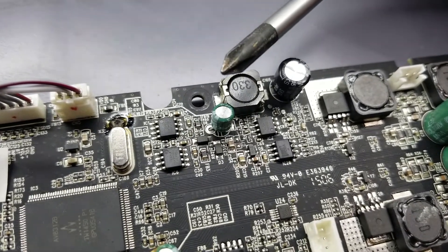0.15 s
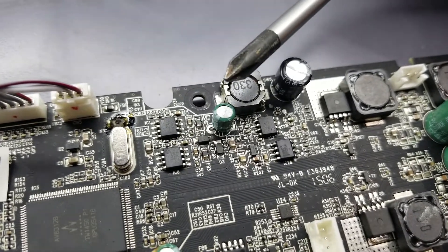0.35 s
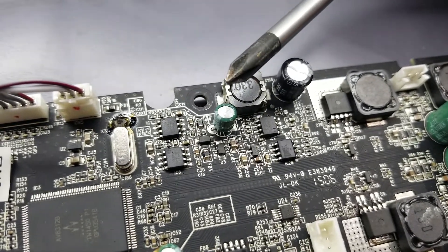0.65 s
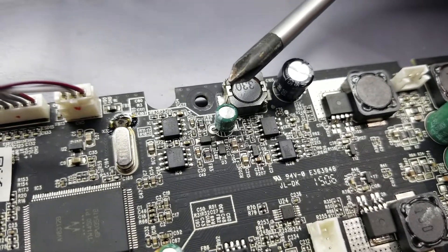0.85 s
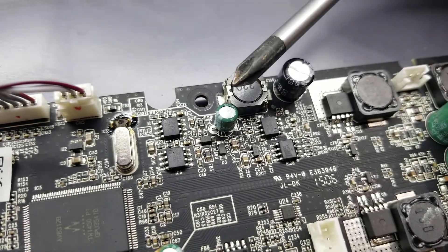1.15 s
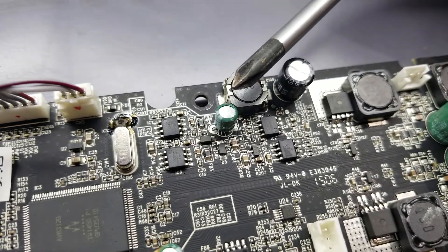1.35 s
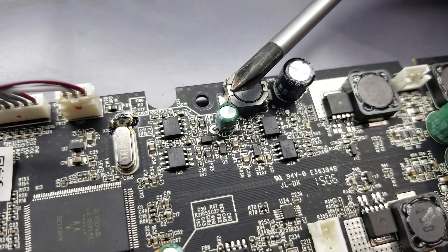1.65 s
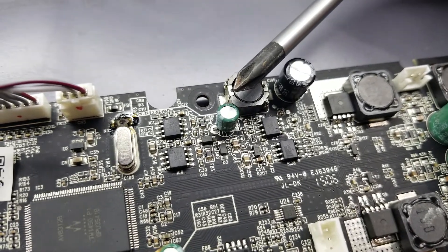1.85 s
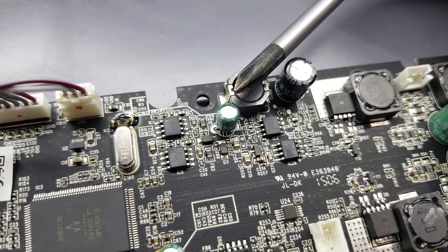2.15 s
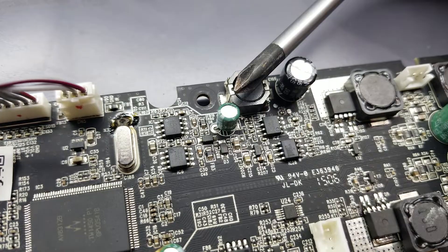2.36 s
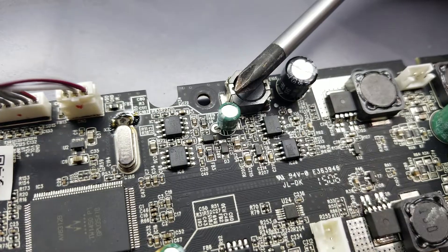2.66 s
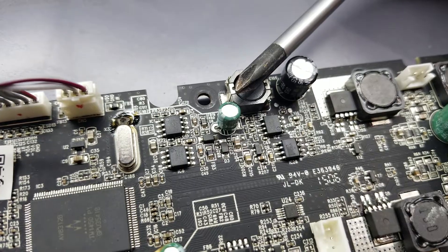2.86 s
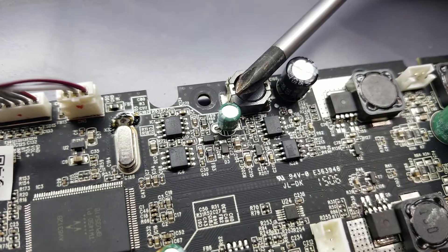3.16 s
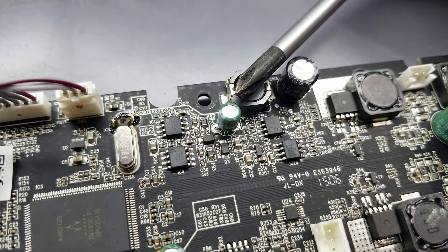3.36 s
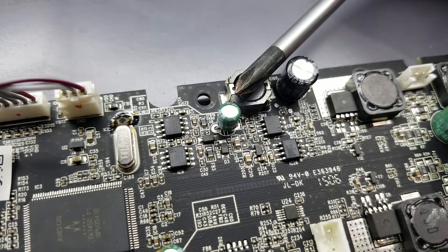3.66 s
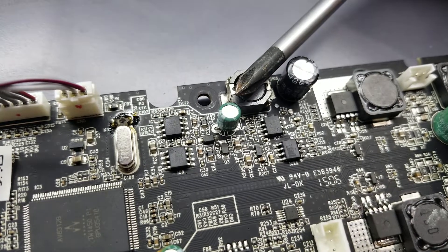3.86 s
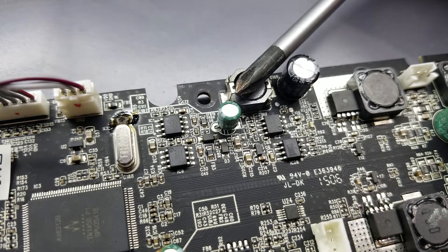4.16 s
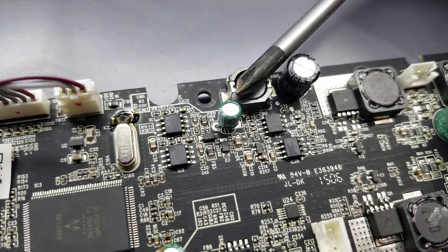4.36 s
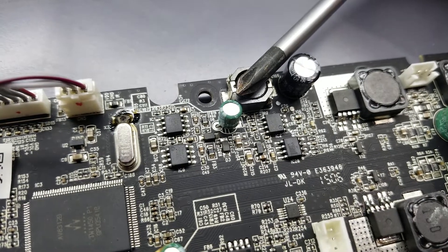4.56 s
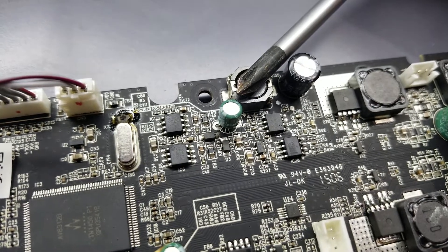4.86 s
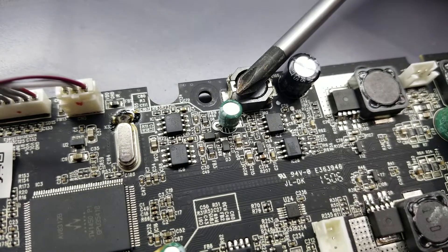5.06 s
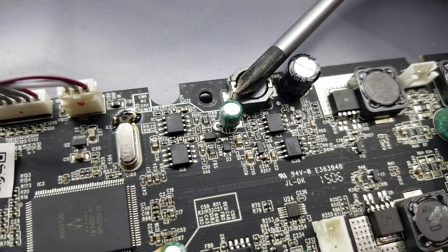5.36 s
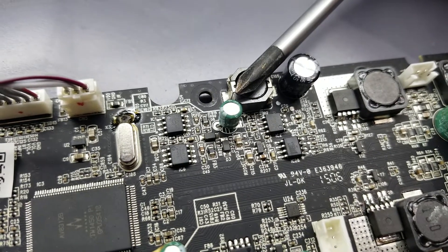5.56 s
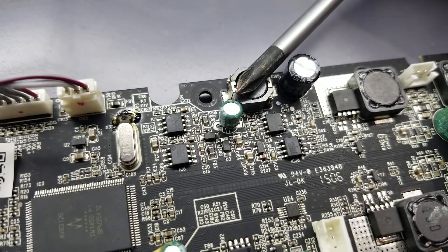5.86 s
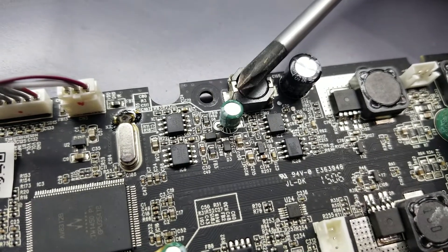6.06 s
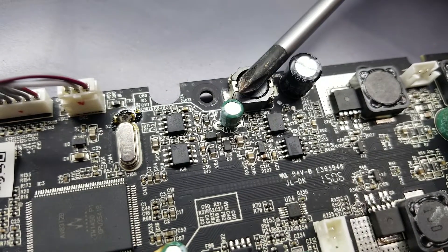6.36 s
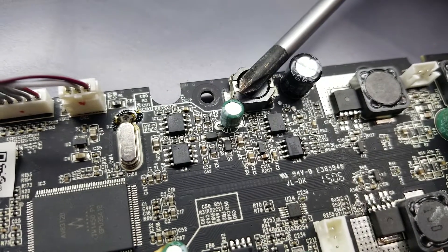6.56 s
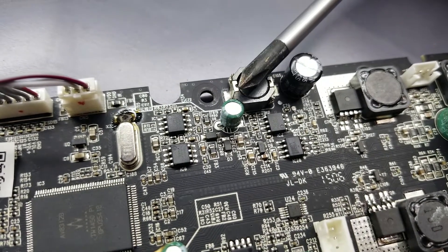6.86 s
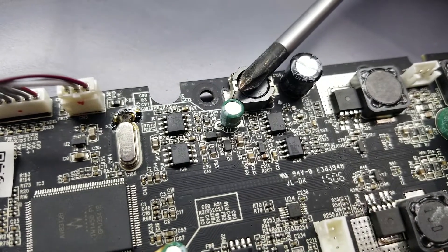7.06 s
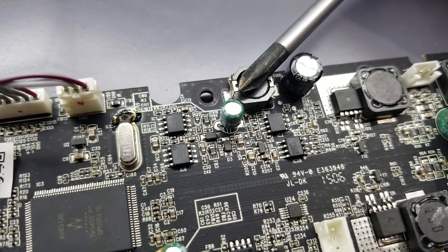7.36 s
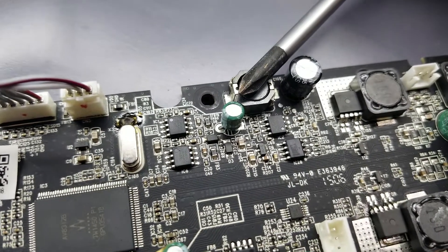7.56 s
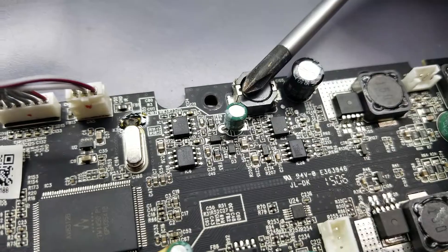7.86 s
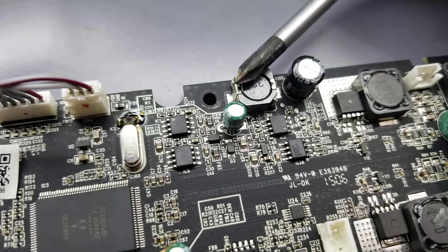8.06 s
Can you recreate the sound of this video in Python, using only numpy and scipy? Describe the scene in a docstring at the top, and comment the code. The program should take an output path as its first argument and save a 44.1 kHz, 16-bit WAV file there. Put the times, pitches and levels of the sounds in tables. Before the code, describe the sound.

Close stereo pickup in a small quiet room. A circuit-board coil whines very high and thin, sagging slightly as a steel screwdriver tip approaches. A crisp click with a soft low knock lands midway; the whine drops and grows much louder. The tip lifts and clicks back twice, the pitch jumping up and falling again, then slides off with tiny scrapes and ticks. A faint low electrical and fan hum continues beneath.

```python
"""Coil whine touched by a steel tip

A coil on a circuit board whines near the top of hearing. A steel screwdriver tip nears it, snaps onto it,
lifts off twice and scrapes away: steel on the core lowers the pitch and the shaft radiates the tone louder.
Strikes and scrapes drive decaying board, coil and shaft modes; knocks are low decaying sines.
Two close ports also receive mains and fan sines, a small room's echo and tail, and coloured noise."""
import sys
import numpy as np
from scipy import signal
from scipy.fft import rfft, irfft
from scipy.io import wavfile

SR = 44100
rng = np.random.default_rng(int(sys.argv[2]) if len(sys.argv) > 2 else 0)


def master(y):
    """Save y as 16-bit WAV."""
    cut = np.clip(np.atleast_2d(y).T, -1, 1)
    pcm = np.round(cut * 32767)  # scale
    wavfile.write(sys.argv[1], SR, pcm.astype(np.int16))


N = 361619
T = np.arange(N) / SR  # time in seconds

# Random wobble of the tone. Each row: cutoff rate in Hz, pitch spread in Hz, level spread in dB.
WOBBLE = [(10, 2.2, .35), (45, 2.4, .5), (300, 5, .16)]
# Pitch while the tip first nears the coil. Each row: time in seconds, pitch in Hz.
APPROACH_PITCH = [(0, 13736), (1.097, 13743), (1.95, 13733), (2.35, 13723), (2.897, 13711), (3.277, 13670),
                  (3.65, 13657), (3.834, 13626), (4.074, 13564), (4.22, 13554), (4.265, 13507),
                  (4.31, 13512), (4.355, 13455), (4.405, 13466), (4.465, 13346), (4.5, 13344)]
# Hops of the tip off the coil. Each row: lift, turn back and landing in seconds, top pitch in Hz,
# pitch just before landing in Hz.
HOPS = [(6.068, 6.215, 6.346, 13690, 13385), (6.763, 6.83, 7.072, 13660, 13215)]
FIRST_TOUCH_S = 4.522  # contact is complete
HOP_RISE_S, HOP_FALL_POWER = 0.014, 2.06
LAND_S, LIFT_S = 0.0094, 0.008  # time for contact to close and to open
# The shaft just above the coil shades the left port and reflects to the right.
# The pair: left change in dB, right change in dB, both at full hop height.
HOP_SHADE_DB = [-3, 5]
# Radiation of the untouched coil to the ports at each pitch. Each row: pitch in Hz, left level in dB,
# right level in dB, phase by which left leads in turns.
BARE_COIL = [(13280, -37, -42, -1.12), (13350, -38, -45, -1.12), (13430, -39.5, -48, -1.07),
             (13500, -40.3, -56, -1.15), (13570, -40.8, -54, -1.22), (13597, -46, -52.5, -1.12),
             (13630, -41.5, -57, -.92), (13670, -40.3, -59, -.97), (13722, -36, -70, -.45),
             (13746, -39, -64, -.35)]
# Radiation with the tip seated. Each row: pitch in Hz, left minus right in dB, left lead in turns.
SEATED_COIL = [(13186, 0.2, -1.15), (13200, -1.5, -1.17), (13214, -2.5, -1.17), (13226, -7, -1.3),
               (13240, -4.5, -1.24), (13280, -8, -1.45), (13310, -11, -1.55), (13342, -8, -1.61)]
# Spells of contact, one list for each. Each row: time in seconds, pitch in Hz, right level in dB.
CONTACT_SPELLS = [
    [(4.52, 13189, -30), (4.54, 13187, -29.1), (4.946, 13188, -30.4), (5.051, 13198, -22.3),
     (5.182, 13206, -26.1), (5.232, 13212, -20.7), (5.277, 13214, -28), (5.5, 13218, -26.3),
     (5.733, 13221, -24.1), (5.838, 13226, -25.6), (5.888, 13223, -24.5), (5.918, 13222, -28.7),
     (5.958, 13219, -27.4), (5.989, 13210, -32), (6.068, 13192, -35.5)],
    [(6.344, 13215, -27), (6.44, 13219, -23.9), (6.6, 13223, -22.8), (6.685, 13219, -30.1),
     (6.763, 13208, -34)],
    [(7.072, 13214, -31.2), (7.327, 13213, -27.8), (7.427, 13226, -26.6), (7.482, 13245, -19.8),
     (7.507, 13260, -21.8), (7.532, 13273, -19), (7.562, 13282, -23.1), (7.602, 13292, -21.7),
     (7.627, 13303, -24.1)],
]
# The tip slides off the core. Each row: time in seconds, pitch in Hz, left level in dB,
# right level in dB, left lead in turns.
SLIDE_OFF = [(7.627, 13303, -35, -24.1, -1.54), (7.687, 13328, -30.6, -26.2, -1.61),
             (7.707, 13336, -37.5, -27.8, -1.61), (7.732, 13343, -34.8, -36, -1.58),
             (7.773, 13348, -39.6, -31.6, -1.53), (7.873, 13354, -39.7, -38.2, -1.42),
             (7.903, 13353, -35.7, -41.6, -1.38), (7.968, 13352, -34.2, -38.3, -1.3),
             (8.068, 13351, -39.4, -49.8, -1.09), (8.088, 13360, -41.5, -46.5, -1.01),
             (8.125, 13417, -46, -40, -.86), (8.199, 13409, -47.6, -38.4, -.76)]

# Tip strikes. Each row: start in seconds, blow strength in dB, left minus right in dB, colour centre in Hz,
# colour width in octaves, rattle decay in ms, weight behind the blow in dB relative to the blow.
STRIKES = [(4.5173, -37, 4.5, 5250, 1.38, 2.3, -20), (6.3434, -31, 5, 5930, 2.15, 2.3, -22.5),
           (7.0673, -45.5, 5.5, 4300, 1.5, 1.2, -16.5), (7.46, -73, -9, 3480, 1.4, 1.5, -34),
           (7.7212, -64.5, 4.5, 4430, 3.9, 2.4, -13), (8.0195, -58.5, 3, 4070, 2, 5, -43),
           (8.13, -39, 4, 2780, 0.4, 1.8, -21.5), (8.1914, -62, 12, 3170, 1.5, 1.8, -32)]
CRACK_DB, CRACK_TO_WALLS_DB = -2, 21
# Strokes of the tip across the coil. Each row: loudest moment in seconds, level in dB,
# left minus right in dB, rise in seconds, fall in seconds.
SCRAPES = [(3.73, -79.5, 3, 0.19, 0.051), (5.51, -72.5, 1, .03, 0.12), (7.6, -72.5, 2, .08, 0.18),
           (7.74, -78, -3, .07, 0.041), (8.012, -65, 7, 0.019, 0.026), (8.052, -55.5, 4.5, 0.011, 0.046),
           (8.132, -52, 7.5, 0.083, 0.0067), (8.135, -73, 11, .003, 0.031)]
SCRAPE_EDGE_DB = -15  # change over one rise or one fall
# Modes of board, coil and shaft. Each row: frequency in Hz, relative level in dB,
# undamped 60 dB decay time in seconds, left minus right in dB.
BOARD_MODES = [(398, -7, 0.045, -1), (658, -22.5, 0.11, 7.5), (1108, -7, 0.048, 2), (1404, -7.5, 0.076, -1),
               (2150, -5, 0.02, 6.5), (2503, -10.5, 0.031, 9.5), (3280, -6, 0.0094, 17),
               (3466, -2, 0.0097, 8.5), (4100, -4.5, 0.008, 25.5), (4515, -5, 0.016, 16),
               (5100, -1, 0.01, 4.5), (5850, -8, 0.015, -2.5), (7170, -5, 0.0085, 11),
               (8670, -5.5, 0.0058, 19), (8580, 4.5, 0.018, -9), (9910, -1, 0.014, -10.5),
               (12020, 5, 0.011, 8.5), (14600, -7, 0.012, -21)]
PORT_LAG_S = 0.0003
# Board knocks on the desk. Each row: time in seconds (5.2 ms before the onset), level in dB,
# left minus right in dB, pitch in Hz.
KNOCKS = [(3.481, -59, 27, 76.4), (4.51, -41.5, 5.0, 129), (4.989, -40.5, 6, 132), (5.342, -55, 8, 143),
          (6.083, -43.5, 2, 105), (6.335, -33, 6, 137.5), (6.756, -54, 2, 78.5), (7.06, -45, 5, 128),
          (7.644, -51.5, 5, 122), (8.128, -47, 5, 147)]
KNOCK_DELAY_S, KNOCK_T60_S = 0.0052, 0.07

ROOM_T60_S, ROOM_DB = 0.28, -8.5
WALL_ECHO_S, WALL_ECHO_DB = 0.011, -20
WALLS_TOP_HZ = 9000  # the walls swallow the treble above this
RINGING_TO_WALLS_DB, RUBBING_TO_WALLS_DB = -18, -6.5

MAINS_HZ = 59.98
# Mains harmonics. Each row: multiple of the mains frequency, rms level in dB before panning.
MAINS_HARMONICS = [(2, -87), (3, -77.5), (4, -74), (5, -74), (6, -87)]
FAN_HZ, FAN_DB, FAN_WAVER_DB = 303.66, -61.5, 1.2
# Narrow hums of the fan housing. Each row: centre in Hz, width in Hz, rms level in dB before panning.
HOUSING_HUMS = [(411.4, 5.1, -70), (306, 7.1, -71), (1382, 1.1, -94)]
# Spectrum of room tone and microphone hiss. Each row: frequency in Hz, relative density in dB per Hz,
# likeness of the ports from 0 to 1, left minus right in dB.
AIR_SPECTRUM = [(20.2, -20, 0, -4.5), (59, -12.5, .6, 3), (139, -9.5, 0.6, 1.5), (166, -9, 0.7, 3),
                (270, -9, 1, 1), (297, -19, 1, 26.5), (340, -2, 0.78, 2), (419, -4.5, 0.18, 1.5),
                (557, -15, 0.48, 6.5), (930, -20, 0, -3.5), (914, -27, 0, 0.5), (2570, -31, 0.03, 4),
                (5830, -35.5, 0, 3), (9800, -36.5, 0, -4), (11150, -37.5, 0.14, 4), (15400, -64, 0, 5)]
AIR_DB = -62.5  # overall rms
TOP_HZ = 16200


def whine():
    """Frequency modulation of a sine: phase integrates pitch; short waves reach each port differently."""
    seated_hz, press_db = read(T, sum(CONTACT_SPELLS, []))
    air_hz, height, touch = tip(seated_hz)
    left_db, right_db, lead = read(air_hz, BARE_COIL)
    left_shade_db, right_shade_db = HOP_SHADE_DB
    bare = np.array([air_hz, left_db + left_shade_db * height, right_db + right_shade_db * height, lead])
    pan_db, lead = read(seated_hz, SEATED_COIL)
    seated = np.array([seated_hz, press_db + pan_db, press_db, lead])
    # contact blends the two states until the slide takes over
    touched = bare + touch * (seated - bare)
    slide_start_s = SLIDE_OFF[0][0]
    hz, left_db, right_db, lead = np.where(T < slide_start_s, touched, read(T, SLIDE_OFF))
    hz = hz + sum(spread_hz * walk(rate) for rate, spread_hz, _ in WOBBLE)
    flutter_db = sum(spread_db * walk(rate) for rate, _, spread_db in WOBBLE)
    turns = np.cumsum(hz) / SR + np.array([lead, 0 * lead])
    amplitude = np.sqrt(2) * undb(np.array([left_db, right_db]) + flutter_db)
    return amplitude * np.sin(2 * np.pi * turns)


def tip(seated_hz):
    """Loading of the coil by nearby steel: pitch in the air, height on a hop (0-1) and contact (0-1)."""
    hz, height = read(T, APPROACH_PITCH)[0], np.zeros(N)
    touch = np.clip((T - FIRST_TOUCH_S) / LAND_S + 1, 0, 1)
    for lift, turn, land, top_hz, last_hz in HOPS:
        up = 1 - np.exp(-np.maximum(T - lift, 0) / HOP_RISE_S)
        down = np.clip((T - turn) / (land - turn), 0, 1) ** HOP_FALL_POWER
        hop_hz = seated_hz + up * (top_hz - seated_hz) - down * (top_hz - last_hz)
        hz = np.where(T > lift, hop_hz, hz)
        height += up * (1 - down)
        touch -= np.interp(T, [lift, lift + LIFT_S, land - LAND_S, land], [0, 1, 1, 0])
    return hz, height, touch


def strikes():
    """Impact excitation: a sharp push and a chatter of rebounds, coloured by the blow, drive the modes."""
    force = np.zeros((2, N))
    ms = np.arange(int(0.03 * SR)) * 1000 / SR
    chatters = rng.standard_normal((len(STRIKES), len(ms)))
    for (start, db, pan, hz, octaves, rattle_ms, weight_db), chatter in zip(STRIKES, chatters):
        chatter[0] = 6.5  # the sharp first push
        low_hz = hz / 2 ** (octaves / 2)
        high_hz = min(hz * 2 ** (octaves / 2), 0.45 * SR)
        tick = chatter * np.exp(-ms / rattle_ms)
        tick = band(band(tick, low_hz, high_hz), low_hz, high_hz)
        tick = tick / np.linalg.norm(tick)
        # the hand's weight follows a moment later and bends the low modes
        weight = np.exp(-((ms - 1.6) / 0.15) ** 2) * undb(weight_db)
        blow = (ports(tick, pan) + weight) * undb(db)
        i = int(start * SR)
        force[:, i:i + len(ms)] += blow[:, :N - i]
    # the bare crack of the contact is heard beside the ringing
    crack = undb(CRACK_DB) * band(force, 1500, 12000)
    return board(force, damping=1), crack


def scrapes():
    """Friction excitation: dense uneven slips, too light to move low modes, drive modes damped by the tip."""
    happens = rng.random(N) < 6000 / SR  # about 6000 slips per second
    slips = happens * undb(1.4 * rng.standard_normal(N)) * rng.choice([-1, 1], N)
    for top_hz in (12000, 9000, 6000):
        slips = band(slips, 2300, top_hz)
    slips = slips * undb(2.8 * walk(51))
    rasp = level(board(np.array([slips, slips]), damping=3), 0)
    # each stroke swells to its loudest moment and dies away, by the same dB over its rise and its fall
    gain = 0
    for loudest, db, pan, rise, fall in SCRAPES:
        distance = np.maximum((loudest - T) / rise, (T - loudest) / fall)
        gain = gain + ports(undb(db + SCRAPE_EDGE_DB * distance), pan)
    return gain * rasp


def board(force, damping):
    """Modal superposition: neighbours have opposite sign, each its own balance; the right port lags."""
    total = np.zeros((2, N))
    for k, (hz, db, t60, pan) in enumerate(BOARD_MODES):
        mode_gain = undb(np.array([[pan / 2], [-pan / 2]]) + db)
        total += (-1) ** k * ring(force * mode_gain, hz, t60 / damping)
    left, right = total
    lag = int(PORT_LAG_S * SR)
    return np.array([left, np.r_[np.zeros(lag), right[:-lag]]])


def knocks():
    """Damped free vibration: each softly starting, decaying sine is the board's low bending on the desk."""
    out = np.zeros((2, N))
    t = np.arange(int(0.2 * SR)) / SR
    envelope = (1 - np.exp(-t / 0.0015)) ** 2 * 1000 ** (-t / KNOCK_T60_S)
    for s, db, pan, hz in KNOCKS:
        swing = np.sin(2 * np.pi * hz * t) * envelope
        i = int((s + KNOCK_DELAY_S) * SR)
        out[:, i:i + len(t)] += ports(swing * undb(db), pan)[:, :N - i]
    return out


def room(x):
    """Reverberation by convolution: one near wall and a diffuse tail unrelated at the two ports."""
    t = np.arange(int(0.4 * SR)) / SR
    tail = rng.standard_normal((2, len(t))) * 1000 ** (-t / ROOM_T60_S) * (t > 0.004)
    tail = undb(ROOM_DB) * tail / np.sqrt(np.sum(tail ** 2, axis=1, keepdims=True))
    tail[:, int(WALL_ECHO_S * SR)] += undb(WALL_ECHO_DB)
    mixed = x + 0.5 * x[::-1]  # each side also takes half of the other
    dull = signal.sosfilt(signal.butter(2, WALLS_TOP_HZ, fs=SR, output="sos"), mixed)
    return signal.fftconvolve(dull, tail, axes=1)[:, :N]


def hum():
    """Beating of near frequencies: mains harmonics against the fan's blade tone, with narrow housing hums."""
    mains = sum(undb(db) * np.sin(2 * np.pi * (k * MAINS_HZ * T + rng.random()))
                for k, db in MAINS_HARMONICS)
    fan = undb(FAN_DB + FAN_WAVER_DB * walk(2.96)) * np.sin(2 * np.pi * FAN_HZ * T)
    housing = 0
    for hz, width_hz, db in HOUSING_HUMS:
        t60 = np.log(1000) / (np.pi * width_hz)  # a narrower resonance decays more slowly
        housing = housing + level(ring(rng.standard_normal(N), hz, t60), db)
    return ports(np.sqrt(2) * (mains + fan) + housing, 0.96)


def air():
    """Partial coherence: sum and difference of two noises set how alike the ports are at each frequency."""
    hz, db, like, pan = np.transpose(AIR_SPECTRUM)
    log_f = np.log(np.maximum(np.arange(N // 2 + 1) * SR / N, 1))
    db, like, pan = (np.interp(log_f, np.log(hz), column) for column in (db, np.clip(like, 0, 1), pan))
    mid, side = rfft(rng.standard_normal((2, N))) * undb(db)
    pair = np.sqrt(1 + like) * mid + np.sqrt(1 - like) * side * np.array([[1], [-1]])
    balance = undb(np.array([pan, -pan]) / 2)
    return level(irfft(pair * balance, N), AIR_DB)


def ring(x, hz, t60):
    """Two-pole resonance: one mode whose pole radius sets its 60 dB decay time."""
    p = np.exp(2j * np.pi * hz / SR - np.log(1000) / (t60 * SR))
    return signal.lfilter([0, p.imag], [1, -2 * p.real, abs(p) ** 2], x)


def band(x, low_hz, high_hz):
    """Band-pass filtering with gentle first-order slopes."""
    return signal.sosfilt(signal.butter(1, [low_hz, high_hz], "band", fs=SR, output="sos"), x)


def walk(rate):
    """Low-passed noise: a smooth random drift of rms 1, with its cutoff in Hz."""
    return level(signal.sosfilt(signal.butter(4, rate, fs=SR, output="sos"), rng.standard_normal(N)), 0)


def ports(x, pan_db):
    """Level difference between ears: one sound shared between left and right."""
    return x * undb(np.array([pan_db / 2 + 0 * x, -pan_db / 2 + 0 * x]))


def level(x, db):
    """Root-mean-square scaling to a level in dB."""
    return x * undb(db) / np.sqrt(np.mean(x ** 2))


def undb(db):
    """Logarithmic level law: decibels to amplitude gain."""
    return 10 ** (np.asarray(db) / 20)


def read(x, rows):
    """Linear interpolation of every later column of a table at x along its first."""
    first, *columns = np.transpose(rows)
    return np.array([np.interp(x, first, column) for column in columns])


def scene():
    """Superposition of direct sound, room and background at the two ports."""
    ringing, crack = strikes()
    rubbing = scrapes() + knocks()
    # the crack spreads in all directions, the ringing is strongest close by
    to_walls = undb(RINGING_TO_WALLS_DB) * ringing + undb(CRACK_TO_WALLS_DB) * crack
    to_walls = to_walls + undb(RUBBING_TO_WALLS_DB) * rubbing
    return whine() + ringing + crack + rubbing + room(to_walls) + hum() + air()


def record(dry):
    """Band limiting: a steep elliptic low-pass cuts the top."""
    return signal.sosfilt(signal.ellip(10, 0.2, 80, TOP_HZ, fs=SR, output="sos"), dry)


dry = scene()
out = record(dry)
master(out)
```